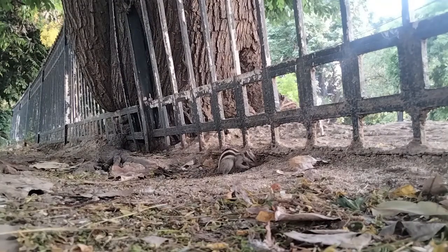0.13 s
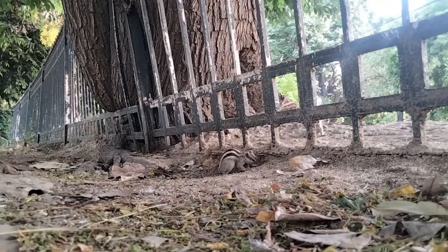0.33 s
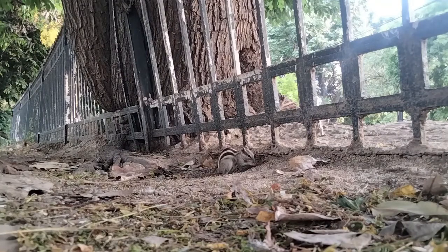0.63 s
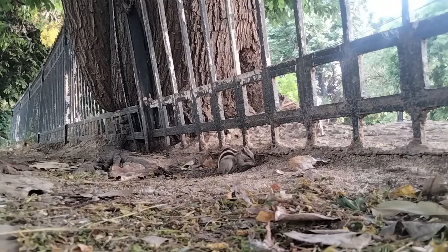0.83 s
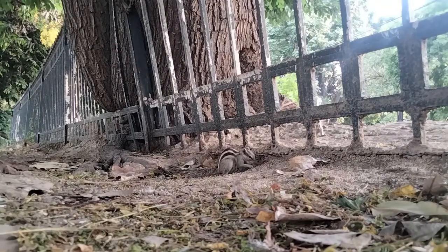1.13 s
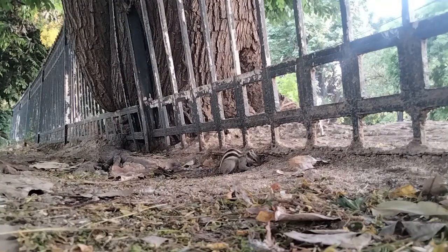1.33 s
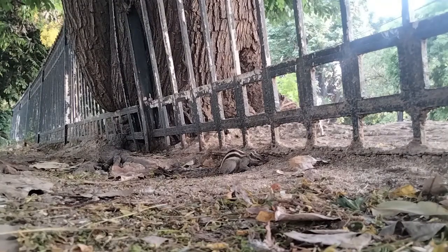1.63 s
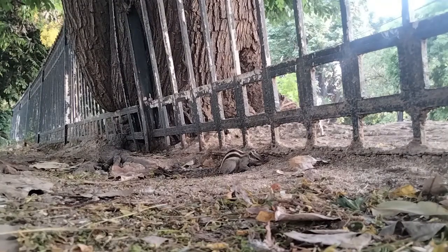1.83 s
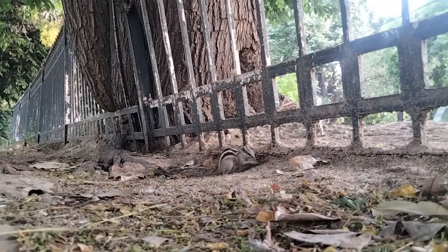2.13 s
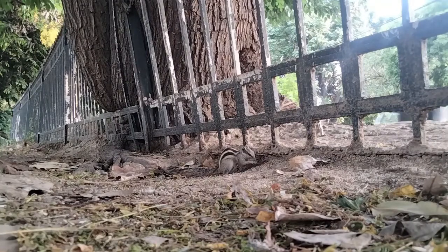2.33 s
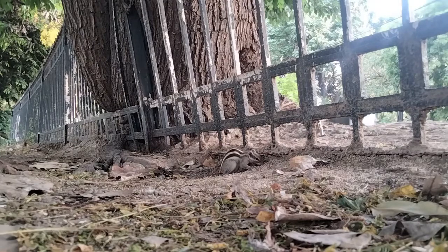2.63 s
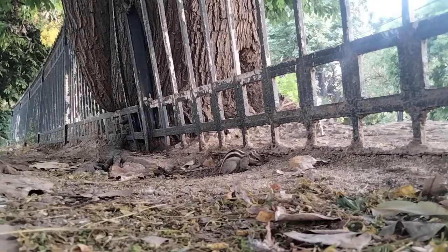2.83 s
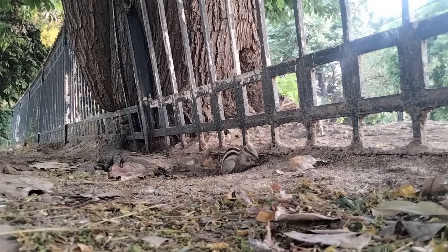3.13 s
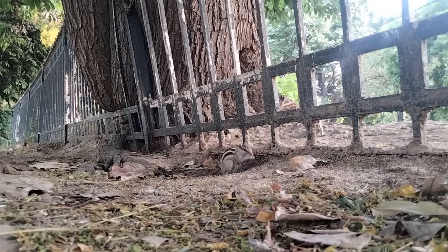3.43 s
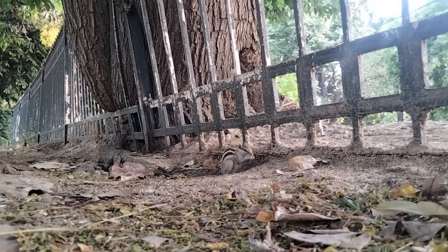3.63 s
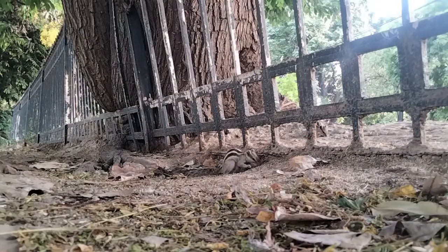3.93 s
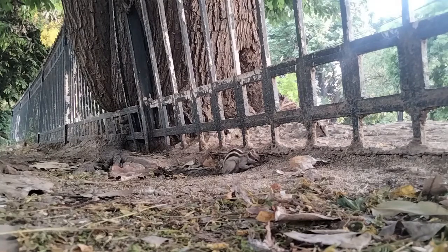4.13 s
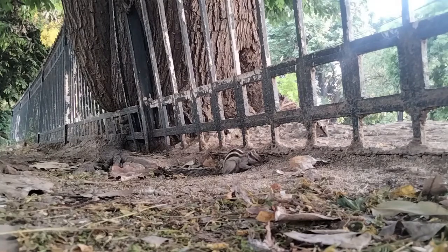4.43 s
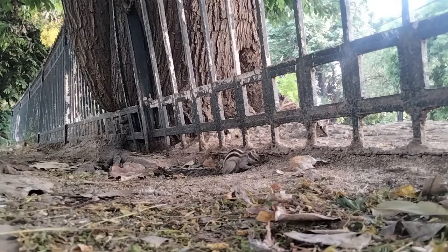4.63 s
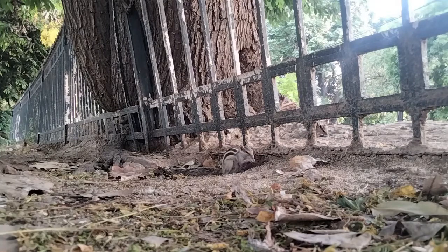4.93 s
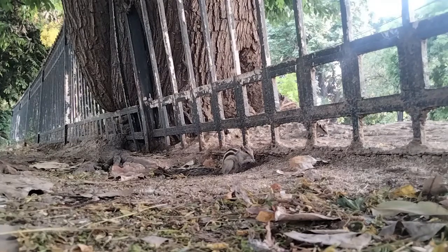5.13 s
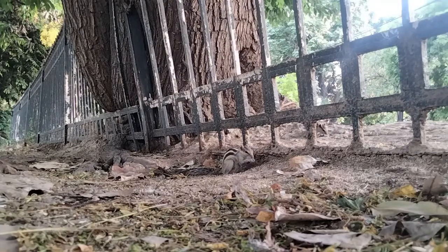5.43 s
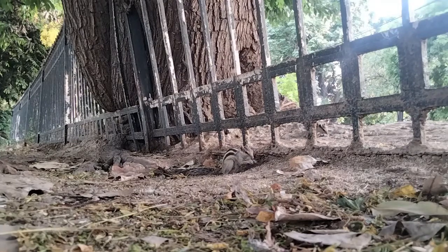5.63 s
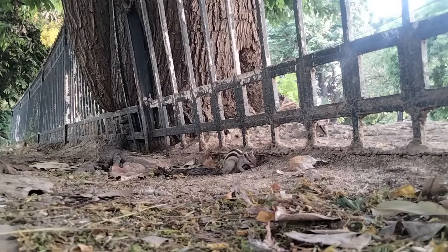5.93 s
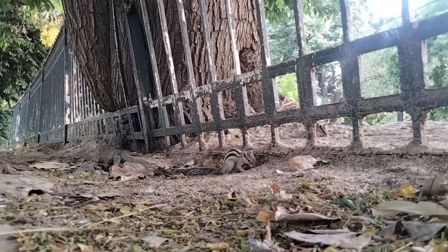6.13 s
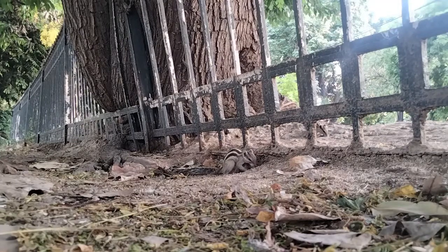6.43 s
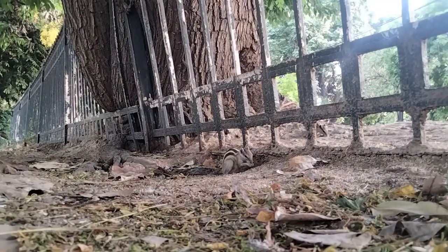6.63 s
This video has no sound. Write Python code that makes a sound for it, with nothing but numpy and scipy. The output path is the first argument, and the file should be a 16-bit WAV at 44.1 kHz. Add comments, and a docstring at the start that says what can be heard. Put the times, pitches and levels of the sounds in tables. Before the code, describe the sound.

Loud piercing squirrel chirps, each a tiny rough upsweep snapping into a pure whistle, echo briefly off trees in a quiet park.

```python
"""Squirrel chirping in a park

A small striped squirrel chirps at the foot of a tree behind an iron fence: a rough upsweep rich in overtones
breaks into a loud, nearly pure arched whistle; near reflections and filtered noise tails form its echoes.
Crows are harmonics through a beak resonance, small birds fluttering glides, a thin high note a flickering sine.
Leaf ticks, a passing vehicle, insect hiss, foliage and still air are shaped noise; the vehicle adds a drone."""
import sys
import numpy as np
from scipy import signal
from scipy.fft import rfft, irfft
from scipy.io import wavfile
from scipy.ndimage import map_coordinates

SR = 44100
rng = np.random.default_rng(int(sys.argv[2]) if len(sys.argv) > 2 else 0)


def unload_audio(sound):
    """Save the sound as a 16-bit wav file, at the path given as the first command line argument."""
    columns = np.transpose(np.atleast_2d(sound))
    # keep every value between -1 and 1, then stretch to whole-number steps
    steps = np.round(np.clip(columns, -1, 1) * 32767)
    wavfile.write(sys.argv[1], SR, steps.astype(np.int16))


N = 298557
TIME = np.arange(N) / SR


def from_db(db):
    """Decibels to amplitude gain."""
    return 10 ** (np.asarray(db) / 20)


def rms_one(x):
    """Scale to unit power."""
    return x / np.sqrt(np.mean(x ** 2) + 1e-20)


def follow(rows, at):
    """Interpolate every column of a table along its first."""
    first, *columns = np.transpose(rows)
    return [np.interp(at, first, c) for c in columns]


def add(out, start_s, sound):
    """Mix a sound in at a time; what falls outside is dropped."""
    i = int(round(start_s * SR))
    part = sound[max(-i, 0):max(N - i, 0)]
    begin = max(i, 0)
    out[begin:begin + len(part)] += part


def drift(rate_hz, size):
    """Smooth random curve through normal knots, rate_hz knots per second."""
    step = rate_hz / SR
    knots = rng.standard_normal(int(size * step) + 3)
    return map_coordinates(knots, [np.arange(size) * step], order=2, mode="nearest")


def phase_of(hz):
    """Running phase in radians of a moving pitch."""
    return 2 * np.pi * np.cumsum(hz) / SR


def butter(order, hz, kind, x):
    """Butterworth filter."""
    return signal.sosfilt(signal.butter(order, hz, kind, fs=SR, output="sos"), x)


def coloured(spectrum):
    """Unit-power noise with a given spectrum, falling 12 dB per octave past its ends."""
    hz, db = np.transpose(spectrum)
    f = np.maximum(np.fft.rfftfreq(N, 1 / SR), 1)
    gain = from_db(np.interp(np.log(f), np.log(hz), db))
    gain *= np.minimum(f / hz[0], 1) ** 2 * np.minimum(hz[-1] / f, 1) ** 2
    return rms_one(irfft(rfft(rng.standard_normal(N)) * gain, N))


def scatter(t60_s, build_s, dull_hz, lumpy_db, reach_s):
    """Echo of trunks and foliage: builds up, dies unevenly, ends with the farthest trees; unit energy."""
    t = np.arange(SR * 2 // 3) / SR
    lumps = from_db(lumpy_db * drift(70, len(t)))
    fading = from_db(-60 * t / t60_s) * (1 - np.exp(-t / build_s)) / (1 + (t / reach_s) ** 8)
    tail = butter(2, dull_hz, "low", rng.standard_normal(len(t)) * lumps * fading)
    return tail / np.sqrt(np.sum(tail ** 2))


def trees(sound):
    """The foliage blurs a far, high sound."""
    tail = scatter(t60_s=0.25, build_s=0.0057, dull_hz=15000, lumpy_db=3.5, reach_s=0.25)
    return signal.fftconvolve(sound, tail)


SWELL_EDGE_DB = -21


def swell(peak_s, length_s):
    """Bell-shaped rise and fall of height 1, at SWELL_EDGE_DB half a length from its peak."""
    return from_db(SWELL_EDGE_DB * (2 * (TIME - peak_s) / length_s) ** 2)


# Chirps. Each row: register break in seconds, level in dB, top pitch in Hz before waver, arch length in seconds,
# upsweep fundamental in dB, overtones in dB, tree echo in dB re near sound, change of the falling end in dB.
CHIRPS = [(-0.035, -27, 8386, 0.0336, -22, -2, -7.5, -33), (1.589, -18.5, 9230, 0.026, -12, -9, -18, 0),
          (1.7076, -17.5, 9235, 0.041, -10, -14.5, -15.5, -19),
          (2.1175, -18.5, 9300, 0.037, -8, -7, -19, -2),
          (2.5767, -17.5, 9475, 0.034, -14.5, -9.5, -19.5, -13.5),
          (2.8745, -17, 9570, 0.039, -13.5, -10, -19.5, -15.5),
          (2.974, -16.5, 9076, 0.037, -10.5, -8, -15, 1),
          (3.5036, -16.5, 9360, 0.036, -10.5, -9.5, -19.5, -17.5),
          (3.6199, -16.5, 9166, 0.044, -9.5, -8, -17, -21.5),
          (4.045, -17, 9614, 0.029, -5.5, -3, -23, 12.5),
          (4.4179, -17, 8955, 0.0218, -12.5, -6, -21.5, 11.5), (4.875, -18, 8980, 0.02, -11.5, -4, -22, 4),
          (5.275, -17.5, 8570, 0.034, -14, -11.5, -24.5, -28),
          (5.6588, -18.5, 8880, 0.022, -23.5, -10, -22.5, 2),
          (6.0584, -16.5, 9130, 0.033, -11, -7, -20.5, 2), (6.155, -18, 9174, 0.027, -13, -6.5, -16, -14),
          (6.3145, -17, 9260, 0.027, -12, -9, -19, 6), (6.4466, -17.5, 9105, 0.027, -11.5, -4, -19.5, 5)]


def squirrel(t60_s=0.74, reach_s=0.19, treetop_hz=8600):
    """Every chirp with its near reflections and the longer echo of the trees."""
    out = np.zeros(N)
    for break_s, db, top_hz, length_s, upsweep_db, overtone_db, echo_db, fall_db in CHIRPS:
        call = chirp(top_hz, length_s, upsweep_db, overtone_db, fall_db)
        near = signal.fftconvolve(call, near_paths())
        tail = scatter(t60_s, build_s=0.0069, dull_hz=14000, lumpy_db=1.5, reach_s=reach_s)
        # foliage swallows the overtones
        far = butter(3, treetop_hz, "low", signal.fftconvolve(call, tail))
        heard = rms_one(near) + from_db(echo_db) * rms_one(far)
        # refer the level to a 33 ms loud body
        body = np.sqrt(0.033 * SR / len(heard))
        add(out, break_s + UPSWEEP[0][0], from_db(db) * heard * body)
    return out


# Voice before the break. Each row: time from the break in seconds, pitch re top pitch, level in dB.
UPSWEEP = [(-.012, .25, -36), (-.0062, .28, -13), (-.0053, .36, -17), (-.0044, .45, -2), (-.0028, .485, 3),
           (-.0012, .525, 2.5), (-.0004, .58, -1), (.001, .78, -16)]
# Voice after the break. Each row: share of the arch length, pitch re top pitch, level in dB.
ARCH = [(0, 0.77, -9), (.07, 0.8905, 4), (.18, 1, 8.5), (.3, 0.98, 5.5), (.5, 0.98, 3), (.68, .87, -7),
        (.85, 0.63, -29), (1, 0.47, -29), (1.1, 0.61, -46)]


def chirp(top_hz, length_s, upsweep_db, overtone_db, fall_db, waver=0.017, rasp=0.12, breath_db=-17):
    """A rough low upsweep rich in overtones jumps up into a nearly pure arch."""
    t = np.arange(UPSWEEP[0][0], length_s * ARCH[-1][0], 1 / SR)
    share = t / length_s
    low_ratio, low_db = follow(UPSWEEP, t)
    arch_ratio, arch_db = follow(ARCH, share)
    broken = np.clip(t / .001 + .5, 0, 1)   # 1 ms crossfade
    pitch_hz = top_hz * (low_ratio + broken * (arch_ratio - low_ratio))
    phase = phase_of(pitch_hz * (1 + waver * drift(900, len(t))))

    low = (1 - broken) * from_db(low_db) * (1 + rasp * drift(1800, len(t)))
    # some calls die before the pitch has come down
    arch = broken * from_db(arch_db + fall_db * np.clip((share - .62) / 0.18, 0, 1))

    def overtone(order):
        """One harmonic, silent above half the sample rate."""
        return from_db(overtone_db) * np.sin(order * phase) * (order * pitch_hz < SR / 2)

    upsweep = from_db(upsweep_db) * np.sin(phase) + from_db(-5.0) * overtone(2) + from_db(-8.0) * overtone(3)
    whistle = np.sin(phase) + from_db(2.5) * overtone(2)
    # turbulent air rides on the voice
    air = butter(2, 3500, "high", rng.standard_normal(len(t)))
    breath = air * (from_db(breath_db) * low + from_db(-52) * arch)
    # so small a mouth radiates no lows
    return butter(8, 2400, "high", low * upsweep + arch * whistle + breath)


# Ground, fence and trunk. Each row: mean delay in seconds, level in dB re direct.
REFLECTIONS = [(.0007, -1.5), (.0021, -23), (.0062, -7.5), (0.0103, -15), (.021, -25)]


def near_paths(wander=.16, litter_db=-5.5):
    """Direct sound, a few hard reflections that shift as the head turns, and scatter from leaf litter."""
    paths = from_db(litter_db) * scatter(t60_s=0.11, build_s=0.0016, dull_hz=14900, lumpy_db=1.5, reach_s=.1)
    paths[0] += 1
    for delay_s, db in REFLECTIONS:
        shifted_s = abs(delay_s * (1 + wander * rng.standard_normal()))
        paths[int(shifted_s * SR)] += from_db(db)
    return paths


# Caws. Each row: start in seconds, length in seconds, direct level in dB, echo level in dB, base pitch in Hz.
CAWS = [(0.054, 0.33, -49.5, -62.5, 479.8), (2.052, 0.35, -70.5, -60.5, 469),
        (4.653, .34, -49.5, -62.5, 470.7), (5.823, 0.31, -49.5, -62, 486.8)]
# Course of one caw. Each row: share of its length, pitch ratio, beak resonance in Hz, level in dB,
# hoarseness ratio.
CAW = [(0, .92, 1446, -12, 0.8), (.13, 1.01, 1670, 4, 1.2), (.3, 1.015, 1893, 2.5, 0.89),
       (0.521, .985, 1800, 4, 0.5), (.68, .93, 1850, -0.5, .2), (0.82, .86, 1920, 1, 0.4),
       (.96, .79, 1860, -4.5, 0.2), (1.12, .72, 1800, -20, .3)]


def crows(beak_width_hz=520, rasp=0.36, hoarse_db=-5, jitter=0.0164, wobble=.007, flicker_db=4.5):
    """Harmonics through one beak resonance; a caw starts hoarse, then clears as its pitch sags."""
    out = np.zeros(N)
    for start_s, length_s, direct_db, echo_db, base_hz in CAWS:
        share = np.arange(0, CAW[-1][0], 1 / (length_s * SR))
        size = len(share)
        ratio, beak_hz, shape_db, hoarse = follow(CAW, share)
        unsteady = 1 + jitter * hoarse * drift(246, size) + wobble * drift(30, size)
        phase = phase_of(base_hz * ratio * unsteady)
        voice = np.zeros(size)
        for k in np.arange(2, 20) / 2:   # alternate cycles differ, which gives weaker half harmonics
            off_beak = (k * base_hz * ratio - beak_hz) / beak_width_hz
            gain = 1 / (1 + off_beak ** 6) + from_db(-35)
            partial_db = -9 * (k % 1 > 0) + flicker_db * drift(27.5, size)
            voice += gain * from_db(partial_db) * np.sin(k * phase + rng.uniform(0, 2 * np.pi))
        air = butter(3, [1350, 2250], "band", rng.standard_normal(size))
        hoarse_voice = rms_one(voice) + from_db(hoarse_db) * hoarse * rms_one(air)
        rattle = 1 + rasp * hoarse * drift(170, size)
        caw = rms_one(hoarse_voice * rattle * from_db(shape_db))
        tail = scatter(t60_s=0.28, build_s=0.0243, dull_hz=1210, lumpy_db=1.5, reach_s=0.332)
        echo = signal.fftconvolve(caw, tail)
        add(out, start_s, from_db(direct_db) * caw)
        # the echo's power is raised by the ratio of its length to the caw's
        add(out, start_s, from_db(echo_db) * rms_one(echo) * np.sqrt(len(echo) / size))
    return out


# Glides. Each row: start in seconds, length in seconds, start pitch in Hz, end pitch in Hz,
# direct level in dB, echo level in dB.
WHISTLES = [(.55, 0.094, 3210, 3123, -73, -77), (0.619, 0.04, 3100, 2392, -65.5, -68),
            (0.649, 0.0352, 2830, 2069, -65.5, -68), (0.675, 0.0666, 2350, 2007, -64, -74),
            (2.91, 0.0596, 3390, 2950, -66, -71.5), (2.99, 0.059, 2535, 2017, -64.5, -71.5),
            (5.027, 0.083, 2710, 2720, -62.5, -82), (6.702, 0.0485, 2220, 1968, -62, -66.5)]


def small_birds():
    """Faint fluttering sine glides, blurred by the trees."""
    out = np.zeros(N)
    for start_s, length_s, start_hz, end_hz, direct_db, echo_db in WHISTLES:
        size = int(length_s * SR)
        flutter = 1 + .022 * drift(450, size)
        phase = phase_of(np.geomspace(start_hz, end_hz, size) * flutter)
        glide = rms_one(np.sqrt(np.hanning(size)) * np.sin(phase))
        add(out, start_s, from_db(direct_db) * glide)
        add(out, start_s, from_db(echo_db) * trees(glide))
    return out


# Swells of the note. Each row: peak in seconds, length in seconds, tone in dB, airy rasp in dB.
NOTE_SWELLS = [(3.81, .24, -76, -66.5), (4.024, 0.15, -56, -62), (4.336, 0.33, -58.5, -56.5),
               (4.717, 0.33, -44.5, -55.5), (5.001, 0.7, -44.5, -67.5), (5.415, 0.092, -53.5, -87),
               (5.577, 0.2, -50.5, -66.5)]
# Pitch of the note, sinking slightly and then partly rising again. Each row: time in seconds,
# pitch in Hz before jitter.
NOTE_PITCH = [(4, 3335), (4.85, 3318), (4.95, 3292), (5.15, 3290), (5.6, 3312)]
# Rasp spectrum. Each row: frequency in Hz, relative level in dB.
NOTE_RASP = [(2700, -13.5), (3150, -6.5), (3400, 0), (3650, -4), (3950, -23.5)]


def thin_note(flicker_db=3.0, throb_db=1.8, overtone_db=-19, echo_db=-25):
    """One flickering tone that swells several times, with an airy rasp around its pitch."""
    tone = np.max([from_db(db) * swell(s, length) for s, length, db, _ in NOTE_SWELLS], axis=0)
    rasp = sum(from_db(db) * swell(s, length) for s, length, _, db in NOTE_SWELLS)
    hz, = follow(NOTE_PITCH, TIME)
    phase = phase_of(hz * (1 + .0035 * drift(260, N)))
    unsteady = from_db(flicker_db * drift(90, N) + throb_db * drift(22, N))
    note = tone * unsteady * (np.sin(phase) + from_db(overtone_db) * np.sin(2 * phase))
    return note + from_db(echo_db) * trees(note)[:N] + rasp * coloured(NOTE_RASP)


# Leaf ticks. Each row: start in seconds, level at onset in dB, centre in Hz, t60 in seconds.
TICKS = [(.03, -69, 11000, .15), (0.138, -51.5, 8100, 0.48), (0.741, -61.5, 9000, 0.36),
         (.87, -61.5, 4260, 0.11), (1.153, -57, 13000, 0.3), (1.401, -51.5, 4650, 0.081),
         (2.828, -49.5, 11500, 0.1357), (5.984, -54, 4054, 0.057)]


def leaves():
    """Dry leaves give short bright ticks: band-passed noise with an exponential decay."""
    out, t = np.zeros(N), np.arange(SR // 3) / SR
    for start_s, db, centre_hz, t60_s in TICKS:
        tick = butter(2, [centre_hz * 0.83, centre_hz * 1.1], "band", rng.standard_normal(len(t)))
        add(out, start_s, from_db(db - 60 * t / t60_s) * rms_one(tick))
    return out


# Vehicle rumble spectrum. Each row: frequency in Hz, relative level in dB.
RUMBLE = [(18, -45), (30, -27.5), (92, -9.5), (188, -12.5), (220, -12), (342, -14.5), (442, -5.5),
          (587, -10.5), (900, -12.5), (1170, -35), (1980, -120)]
# Tyre noise spectrum. Each row: frequency in Hz, relative level in dB.
TYRES = [(600, -8), (800, -1.5), (1050, 2), (1350, -2), (1650, -8), (2000, -29), (3000, -31.5)]
# Tyre noise of the road. Each row: time in seconds, mean level in dB.
TYRE_LEVEL = [(0, -71), (.75, -56.5), (1.5, -62.5), (2.05, -57), (3.0, -69.5), (3.6, -82.5), (3.9, -68),
              (4.8, -62.5), (5.6, -64), (6.77, -57)]
# Drone partials. Each row: multiple of DRONE_HZ, mean level in dB re drone.
DRONE_ORDERS = [(.5, -6), (1, 2), (1.5, -2.5), (2, -12), (2.5, -17)]
# PASSING_S: time to drive the nearest distance; LEAVING: extra loss as it leaves
NEAREST_S, PASSING_S, LEAVING_DB_PER_S = 1.46, 0.31, 8
RUMBLE_DB, FAR_RUMBLE_DB = -52.5, -79.5   # vehicle at its nearest; steady town behind it
# second harmonic of the engine; FOLLOWS in dB per dB of rumble
DRONE_HZ, DRONE_DB, DRONE_FOLLOWS = 447.3, -55, 0.97


def traffic(waver=0.0033, uneven_db=1.9, tyre_uneven_db=0.5):
    """One vehicle's rumble and wavering drone come and go by 1/distance over the road's tyre noise."""
    since_s = TIME - NEAREST_S
    distance = np.hypot(1, since_s / PASSING_S)   # re nearest
    passing_db = -20 * np.log10(distance) - LEAVING_DB_PER_S * np.maximum(since_s, 0)
    passing_db += uneven_db * drift(9, N)
    rumble = np.hypot(from_db(RUMBLE_DB + passing_db), from_db(FAR_RUMBLE_DB)) * coloured(RUMBLE)

    tyre_db, = follow(TYRE_LEVEL, TIME)
    tyres = from_db(tyre_db + tyre_uneven_db * drift(13, N)) * coloured(TYRES)

    phase = phase_of(DRONE_HZ * (1 + waver * drift(30, N)))
    drone = sum(from_db(db + 2 * drift(5.1, N)) * np.sin(k * phase) for k, db in DRONE_ORDERS)
    return rumble + tyres + from_db(DRONE_DB + DRONE_FOLLOWS * passing_db) * drone


# Insect hiss course. Each row: time in seconds, level in dB before HISS_GAIN_DB.
HISS_LEVEL = [(0.0, -70), (0.34, -63.5), (0.64, -62), (3.04, -69.5), (3.24, -70), (4.05, -77),
              (4.22, -68.5), (4.45, -71), (4.86, -59.5), (5.22, -65.5), (6.32, -60.5), (6.77, -64.5)]
# Insect hiss spectrum. Each row: frequency in Hz, relative level in dB.
HISS = [(4000, -33.5), (4800, -12.5), (5300, -5), (6000, -1.5), (6600, -3.5), (7200, -12.5), (8500, -24)]
HISS_GAIN_DB = -0.5


def insects():
    """High band of noise whose level rises and falls."""
    hiss_db, = follow(HISS_LEVEL, TIME)
    return from_db(hiss_db + HISS_GAIN_DB) * coloured(HISS)


# Foliage swells. Each row: peak in seconds, length in seconds, level in dB.
RUSTLES = [(0.106, 0.41, -54), (1.4, 2.37, -66.5), (2.402, 2.4, -65.5), (4.898, 2.78, -61.5)]
# Foliage spectrum. Each row: frequency in Hz, relative level in dB.
RUSTLE = [(2500, -4), (4300, 0), (7500, -3), (10000, 1.5), (11500, -11.5), (13000, -12.5), (15500, -11.5)]


def foliage():
    """Faint rustle: bright noise in bell-shaped swells, slightly uneven."""
    stirring = sum(from_db(db) * swell(s, length) for s, length, db in RUSTLES)
    return stirring * from_db(0.79 * drift(51, N)) * coloured(RUSTLE)


# Still air spectrum. Each row: frequency in Hz, relative level in dB.
AIR = [(15, -36), (25, -4.5), (103, 3), (125, 0), (210, -3), (412, -11), (559, -41), (597, -26),
       (1170, -12.5), (1770, -5), (4500, -43.5), (5850, -76.5), (9900, -120)]
AIR_DB = -69.5


def still_air():
    """Steady, mostly low noise."""
    return from_db(AIR_DB) * coloured(AIR)


def scene():
    """Everything reaches both channels alike."""
    animals = squirrel() + crows() + small_birds()
    park = animals + thin_note() + leaves() + traffic() + insects() + foliage() + still_air()
    return np.stack([park, park])


CUTOFF_HZ = 15900


def record(dry):
    """An elliptic low-pass cuts the top steeply."""
    return signal.sosfilt(signal.ellip(12, .2, 80, CUTOFF_HZ, fs=SR, output="sos"), dry)


dry = scene()
out = record(dry)
unload_audio(out)
```